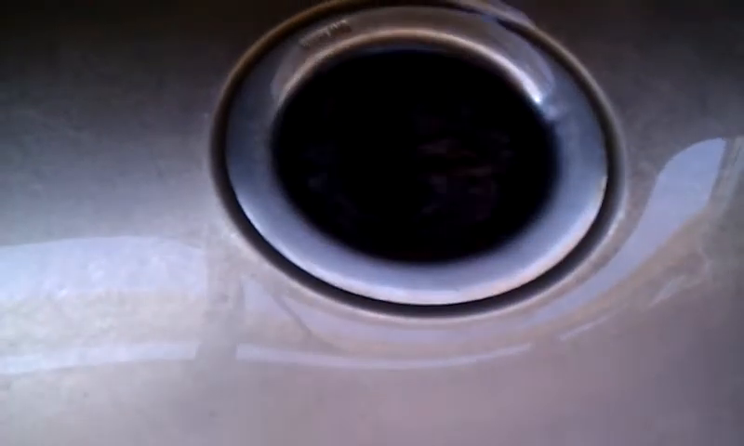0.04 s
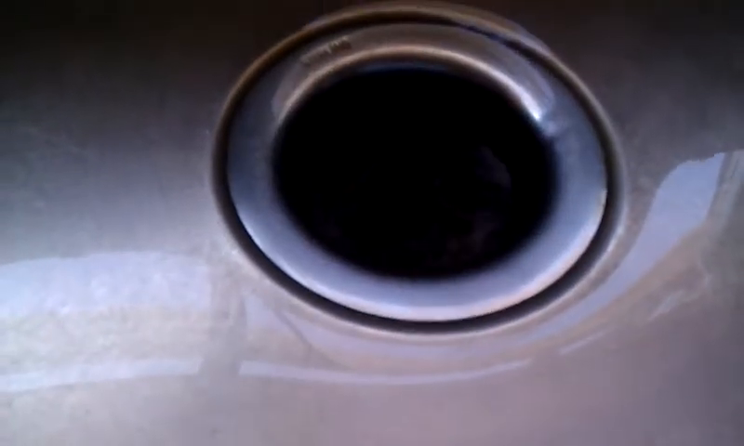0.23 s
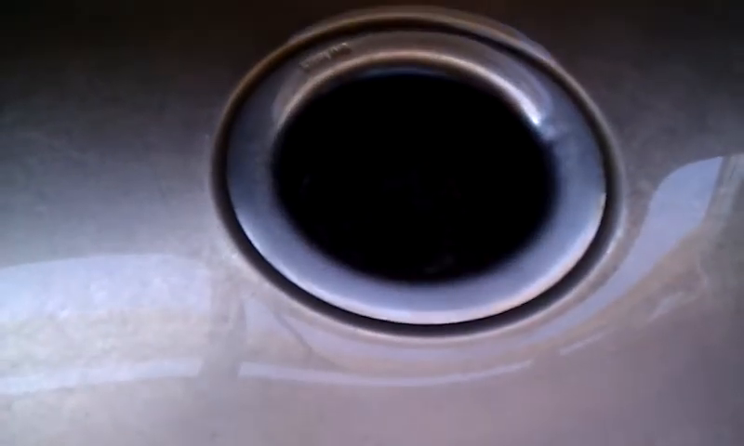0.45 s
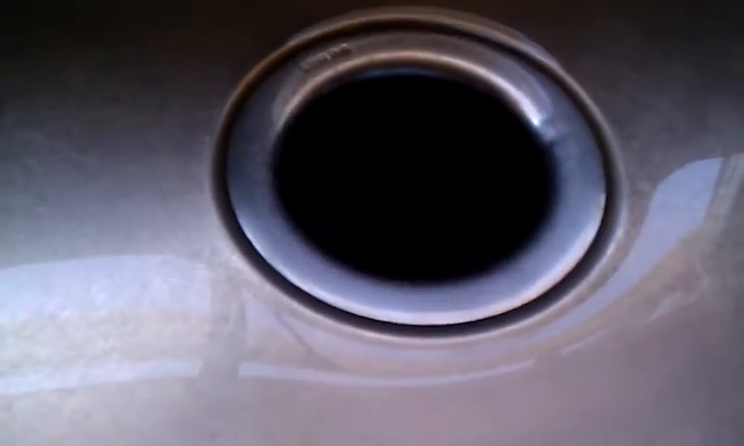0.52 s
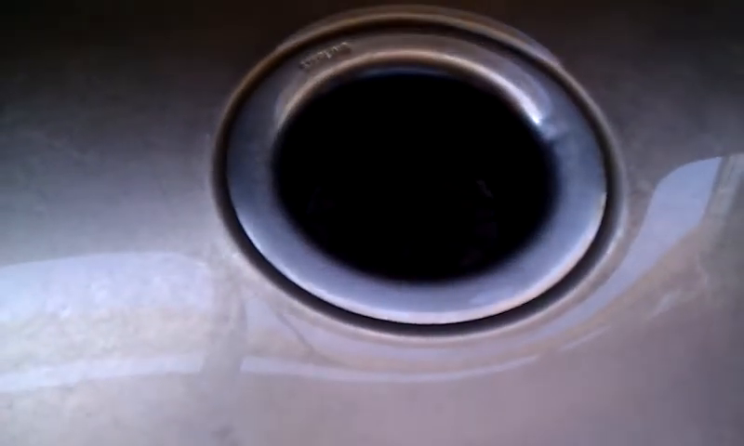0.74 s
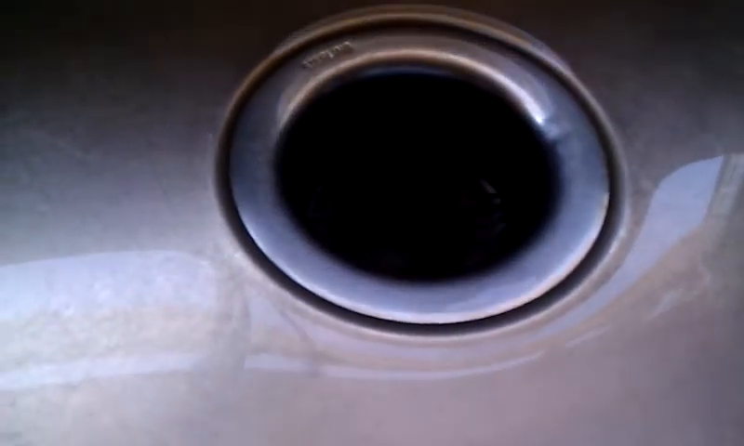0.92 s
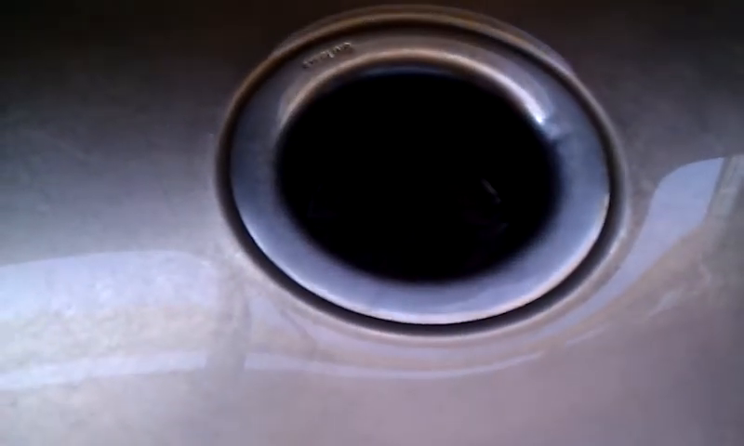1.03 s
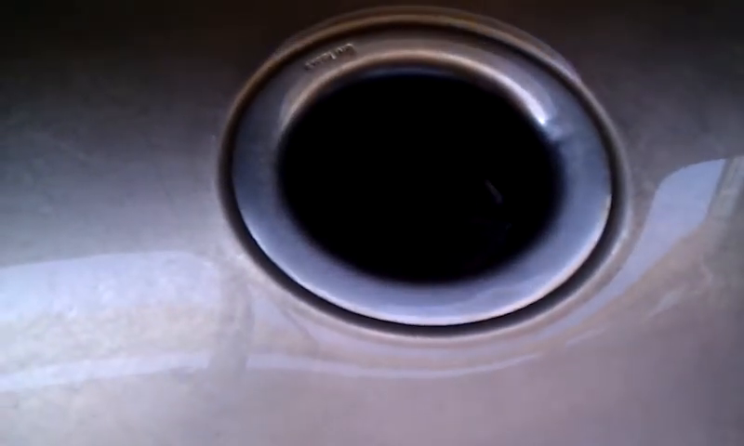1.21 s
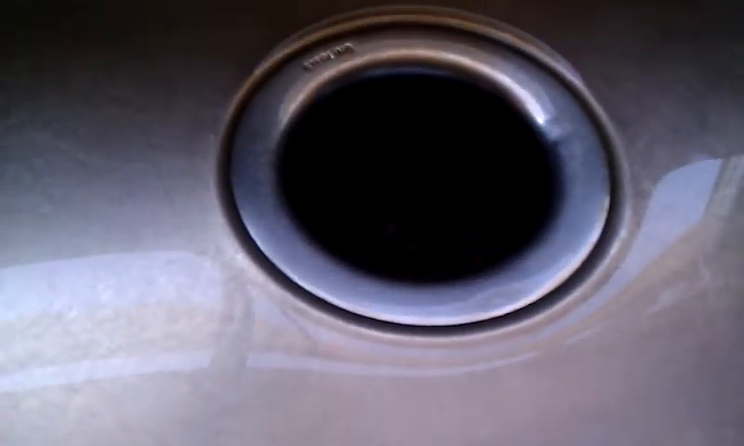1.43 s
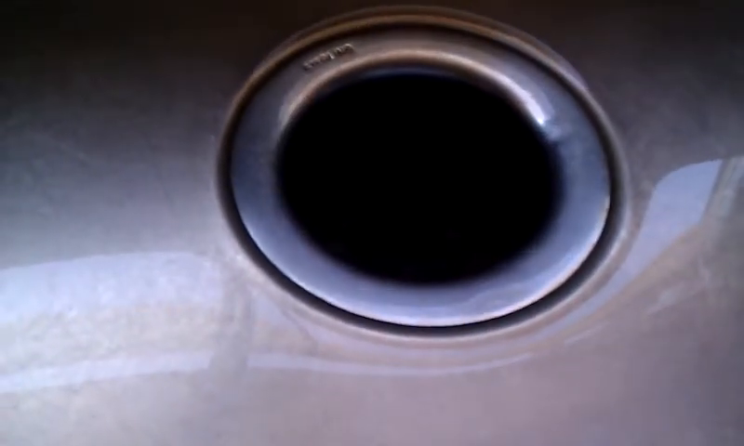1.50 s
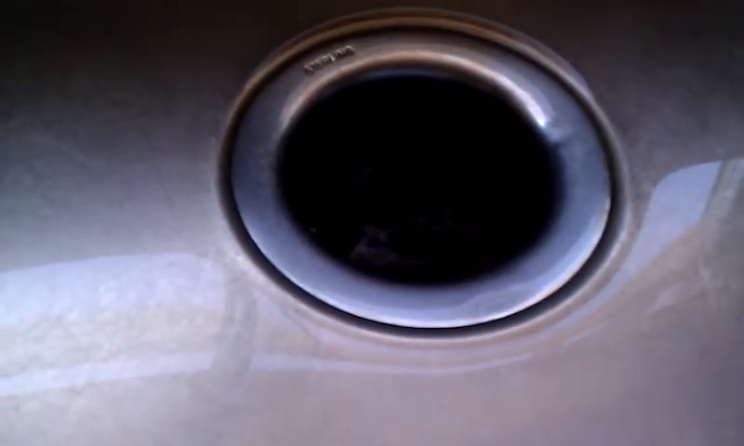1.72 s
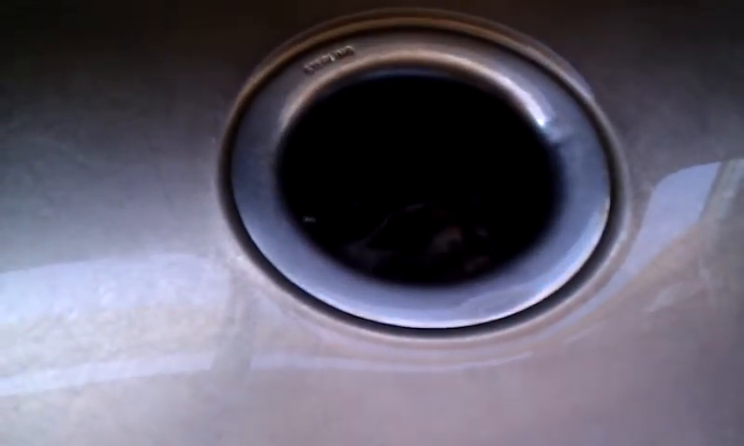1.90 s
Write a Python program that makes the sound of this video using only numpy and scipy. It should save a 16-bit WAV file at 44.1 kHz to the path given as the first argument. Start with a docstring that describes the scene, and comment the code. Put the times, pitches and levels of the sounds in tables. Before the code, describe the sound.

Close to a sink drain in a small quiet room, water splashes briefly, pauses, then gurgles down the ringing waste pipe. The bubbling gradually fades into separate plops and a few faint drips.

```python
"""A short splash, then a long gurgle thinning to single plops: a sink draining, close up.
The microphone is just above the plughole. Each trapped bubble rings briefly and rises in pitch.
The waste pipe hums along underneath, the basin throws the sound back,
and a small quiet room adds its tail."""
import sys
import numpy as np
from scipy import signal
from scipy.fft import rfft, irfft, next_fast_len
from scipy.io import wavfile
from scipy.ndimage import uniform_filter1d, minimum_filter1d

SR = 44100
rng = np.random.default_rng(int(sys.argv[2]) if len(sys.argv) > 2 else 0)


def store_wav(level_fs):
    """Save 16-bit WAV to argv[1]."""
    pcm = np.round(np.clip(np.atleast_2d(level_fs), -1, 1) * 32767)
    wavfile.write(sys.argv[1], SR, pcm.T.astype(np.int16))


N = 85995
TIME = np.arange(N) / SR
RISE_PER_S, ATTACK_CYCLES = 7.95, 0.46  # rise: share of a bubble's starting pitch

# loudest bubbles, right under the microphone (time [s], pitch [Hz], relative peak [dB], ring time [ms])
PLOPS = [(.2442,3640,-11,0.8),(.2444,6440,-11.5,0.41),(.2465,3430,-10.5,1.7),(0.2603,6960,-18,1.6),(.2602,3410,-16.5,3.3),(0.262,1070,-20.5,7.2),(.27,4780,-14,0.73),
         (0.2936,3920,-8.5,1.2),(.2989,3230,-15.5,5),(0.307,1700,-10.5,0.72),(0.3079,1127,-23.5,5.3),(0.314,3440,-9.5,0.76),(0.319,4160,-12,1.1),(0.32,7450,-16,1.05),(0.353,1825,-19.5,2.3),
         (0.5445,1250,-14.5,1.7),(0.5482,1380,-11.5,4.2),(.5825,1000,-26.5,0.79),(0.5823,7320,-18,1.04),(.5999,7520,-17,1.2),(0.5995,1150,-16,0.52),(.612,1290,-9.5,1),(.6168,1050,-11.5,1.5),(0.6205,1333,-16.5,10),(0.632,1510,-16.5,5.4),(0.6548,1156,-10,2.7),(0.6562,4540,-1.5,0.81),(0.6667,4500,-20.5,0.89),
         (.6922,895,-19.5,3),(.6998,866,-12,3.6),(0.7163,6500,-21.5,3.7),(0.7236,1120,-15.5,2.8),(0.7536,1040,-12.5,3.2),(0.753,6700,-18.5,1.3),(0.7684,1540,-16,7.5),(0.7751,1350,-12,0.69),(.8,3000,-9.5,0.84),(0.804,1325,-13.5,6.3),(0.8175,7100,-15,0.84),(.8197,4900,-17,2.3),(0.8648,4280,-16,1.2),
         (.941,6600,-20,1.1),(.9409,990,-13,2),(.9745,3400,-16.5,1.9),(.975,1330,-18,1.1),(1.0075,3590,-10.5,0.82),(1.015,1190,-15,3.1),(1.0288,1103,-19,19),(1.0619,1042,-15.5,5.4),(1.102,1080,-17,9),(1.1294,1050,-23.5,18),(1.143,4440,-20.5,1.9),(1.1713,3100,-21.5,3.9),(1.206,1318,-21.5,5),(1.245,1670,-24,3.1),
         (1.3087,3130,-14,0.62),(1.3153,1244,-19.5,14),(1.316,7400,-21,0.83),(1.3366,1778,-24.5,18),(1.3911,1165,-19.5,7.6),(1.4013,3185,-15.5,1.86),(1.4067,1206,-18.5,3.2),(1.448,1814,-25.5,2.8),(1.504,1503,-14.5,5.1),(1.5257,1092,-22,11),(1.7938,8050,-35,1.6)]
# the film bursts more gently as the flow slackens (time [s], relative level [dB])
SNAP_LEVEL = [(.3,-6.5),(1.5,-7)]
def plops():
    """Each bubble opens with a snap of its film and rings; the shorter the ring, the stronger the snap."""
    out, t = np.zeros(N), np.arange(SR // 100) / SR
    trim_db, snap_s = -0.5, 0.0021
    for start, hz, db, ring_ms in PLOPS:
        ring_s = ring_ms / 1000
        add(out, start, undb(db + trim_db) * bubble(hz, ring_s, RISE_PER_S, ATTACK_CYCLES))
        band = signal.butter(3, [.25 * hz, 1.3 * hz], "band", fs=SR)
        snap = unit(signal.lfilter(*band, rng.standard_normal(len(t)))) * np.exp(-t / snap_s)
        snap_gain = undb(db) * envelope(SNAP_LEVEL, start) * snap_s / (snap_s + ring_s)
        add(out, start, snap_gain * snap)
    return out


# crowds in the plughole: levels (time [s], relative level [dB]), colours (frequency [Hz], gain [dB])
GLUG_LEVEL = [(0,-84.5),(.24,-49.5),(.26,-39.5),(.32,-31.5),(.36,-42.5),(.54,-49.5),(.62,-31),(.7,-24),(.8,-32),(1,-33),(1.15,-49.5),(1.32,-36.5),(1.42,-52.5),(1.65,-42.5),(1.95,-57)]
GLUG_COLOUR = [(90,-20),(170,-14),(280,-4),(400,-6),(540,-2.5),(800,6),(1200,-12.5)]
GURGLE_LEVEL = [(0,-59.5),(.24,-56),(.265,-36),(.38,-40.5),(.45,-62),(.605,-33.5),(.635,-24),(.74,-28),(.81,-26.5),(.88,-26.5),(1.08,-27.5),(1.27,-37),(1.34,-31.5),(1.47,-42.5),(1.53,-39),(1.62,-45.5),(1.95,-52)]
GURGLE_COLOUR = [(500, -8.5), (850, -20), (1070, -4), (1250, -12.5), (1450, -1.5), (1750, -9.5),
                 (2400, -12), (3500, -15)]
SPRAY_LEVEL = [(0,-55.5),(.24,-53.5),(.25,-28),(.32,-44.5),(.35,-41),(.41,-40.5),(.46,-71),(.6,-45),(.67,-25),(.72,-40),(.83,-29.5),(.96,-39.5),(1.02,-30),(1.1,-40),(1.23,-41.5),(1.35,-35),(1.48,-43),(1.52,-38.5),(1.6,-55),(1.95,-82)]
SPRAY_COLOUR = [(1500,12),(2500,-13.5),(3200,0.5),(4000,-1.5),(5000,-4.5),(6000,-22.5)]
FIZZ_LEVEL = [(0,-79),(.24,-75),(.25,-46),(.32,-45.5),(.35,-82),(.57,-65.5),(.66,-39),(.83,-41),(1.1,-44.5),(1.26,-50.5),(1.32,-45.5),(1.48,-59.5),(1.52,-46),(1.57,-55.5),(1.95,-113)]
FIZZ_COLOUR = [(3000,-11.5),(4800,-2.5),(6700,-4),(8000,0.5)]
def gurgling():
    """Four crowds of lesser bubbles, from large glugs to fine fizz: the smaller, the higher they ring."""
    glugs = crowd(GLUG_LEVEL, GLUG_COLOUR, (185, 828), trim_db=-6.5, cycles=1.3, spread_db=1.5, count=900)
    gurgle = crowd(GURGLE_LEVEL, GURGLE_COLOUR, (736.6, 2440),
                   trim_db=-3, cycles=3.4, spread_db=3, count=1500)
    spray = crowd(SPRAY_LEVEL, SPRAY_COLOUR, (2185, 5180),
                  trim_db=-2.5, cycles=6.4, spread_db=3.5, count=4200)
    fizz = crowd(FIZZ_LEVEL, FIZZ_COLOUR, (4495, 8020), trim_db=5, cycles=12, spread_db=5, count=2200)
    return glugs + gurgle + spray + fizz


def crowd(levels, tint, band_hz, trim_db, cycles, spread_db, count):
    """Bubbles of random size and strength, evened out and then shaped by a level curve."""
    out = np.zeros(N)
    low_hz, high_hz = band_hz
    for when, size, strength, length, glide in rng.random((count, 5)):
        hz = low_hz * (high_hz / low_hz) ** size
        ring_s = cycles * 2 ** (2 * length - 1) / hz
        ring = bubble(hz, ring_s, 2 * glide * RISE_PER_S, ATTACK_CYCLES)
        add(out, when * N / SR, undb(-spread_db * np.log(1 - strength)) * ring)
    out = colour(out, tint)
    power = uniform_filter1d(uniform_filter1d(out ** 2, size=1800), size=900)
    return undb(trim_db) * envelope(levels) * out / np.sqrt(power + 1e-12)


def bubble(hz, ring_s, rise, swell_cycles):
    """Trapped air rings as a damped sine that swells over some cycles and glides in pitch."""
    t = np.arange(int(7 * ring_s * SR) + 8) / SR
    swell = (1 - np.exp(-t * hz / swell_cycles)) * np.exp(-t / ring_s)
    return swell / swell.max() * np.sin(2 * np.pi * hz * (t + rise * t * t / 2))


# waste pipe and trap, below the plughole (frequency [Hz], relative gain [dB], t60 [s])
PIPE_MODES = [(123.7,8,1),(179.3,6.5,0.47),(272.1,9.5,0.3),(368.3,3,0.24),(405.4,1,0.14),(458.2,2.5,0.35),(585,3,.3),(616.7,3,.4),(712,-7.5,0.89),(1530,-23.5,0.18)]
# water in the trap shifts the tuning (time [s], pitch [ratio])
PIPE_TUNING = [(.4,1.04),(0.799,1)]
def pipe(water):
    """The air column and trap ring on after each bubble, wavering as the water sloshes."""
    out = np.zeros(N)
    tuning = np.interp(TIME, *np.array(PIPE_TUNING).T)
    for hz, db, t60 in PIPE_MODES:
        slosh = 1 + .014 * waver(per_s=14)
        out += undb(db) * resonate(water, hz * tuning * slosh, t60)
    return undb(4) * out


# gulps farther down, deep in the trap (time [s], pitch [Hz], peak [dB], ring time [ms], rise [1/s])
GULPS = [(1.283,250,-30.5,4.5,20.5),(1.638,647,-35.5,20,-6),(1.678,671,-25.5,9.6,28.5),(1.808,712,-38,4.6,3)]
def gulps():
    """Large pockets of air swell softly and bend in pitch."""
    out = np.zeros(N)
    for start, hz, db, ring_ms, rise in GULPS:
        add(out, start, undb(db) * bubble(hz, ring_ms / 1000, rise, swell_cycles=2.7))
    return out


# last drops, close to the microphone (time [s], pitch [Hz], peak [dB], ring time [ms])
DRIPS = [(1.5435,3200,-25,2.8),(1.5495,3070,-24.5,3.5),(1.6846,2030,-32,5),(1.6845,4200,-30,2.2),(1.7935,3330,-30.5,1.8)]
# metal strainer in the plughole (frequency [Hz], gain [dB], t60 [s])
STRAINER_MODES = [(3068,11,.33),(3195,10,.3)]
def drips():
    """The last drops plink without a snap and leave the strainer ringing."""
    out = np.zeros(N)
    for start, hz, db, ring_ms in DRIPS:
        add(out, start, undb(db) * bubble(hz, ring_ms / 1000, RISE_PER_S / 2, swell_cycles=1.3))
    return out + sum(undb(db) * resonate(out, hz, t60) for hz, db, t60 in STRAINER_MODES)


# hiss off the pipe wall (frequency [Hz], gain [dB])
WASH_COLOUR = [(900,-23),(1900,6.5),(4200,7),(6000,-16.5)]
def wash():
    """Water sheeting down the pipe wall fills the gaps between the bubbles of the spray."""
    return undb(-8) * envelope(SPRAY_LEVEL) * noise(WASH_COLOUR)


def high_hiss():
    """A brief, faint, very high hiss at the gurgle's loudest moment."""
    centre_s, width_s = 0.6585, 0.0093
    hiss = unit(butter(rng.standard_normal(N), 8, (12500, 15500), "band"))
    return undb(-39) * hiss * np.exp(-.5 * ((TIME - centre_s) / width_s) ** 2)


# rumble from down the pipe (time [s], level [dB])
FLOW_LEVEL = [(0,-78),(.55,-66),(0.662,-50),(1.101,-51.5),(1.451,-54),(1.95,-65)]
# its colour (frequency [Hz], gain [dB])
FLOW_COLOUR = [(60,-3.5),(120,7),(190,8),(300,-29.5)]
def flow():
    """Water running away down the pipe rumbles softly."""
    return envelope(FLOW_LEVEL) * noise(FLOW_COLOUR)


# draught behind the last plops (time [s], level [dB])
DRAUGHT_LEVEL = [(.9,-79),(1.25,-46.5),(1.4,-55.5),(1.55,-43.5),(1.75,-55),(1.95,-52.5)]
def draught():
    """Air drawn through the emptying pipe sounds a soft, breathy note."""
    hz, t60 = 737, 0.056
    breath = resonate(rng.standard_normal(N), hz, t60)
    note = resonate(breath, hz, t60 / 10)
    power = uniform_filter1d(note ** 2, size=SR // 10)
    return envelope(DRAUGHT_LEVEL) * note / np.sqrt(power)


def echoes(x, delay_s, t60, treble_t60, split_hz):
    """Dense reflections off nearby surfaces; the treble has its own decay."""
    t = np.arange(SR // 2) / SR
    low = butter(rng.standard_normal(len(t)), 2, split_hz, "low")
    high = butter(rng.standard_normal(len(t)), 2, split_hz, "high")
    arrived = t > delay_s
    tail = (low * fade(t, t60) + high * fade(t, treble_t60)) * arrived
    return signal.fftconvolve(x, tail / np.linalg.norm(fade(t, t60) * arrived))[:N]


# the quiet room around the sink (frequency [Hz], gain [dB])
ROOM_COLOUR = [(30, -18.5), (100, -2), (290, 2), (560, 7), (1300, -7.5), (2400, -0.5), (3600, -5),
               (5200, -11), (8000, -19.5)]
def room_tone():
    """Faint, steady noise far behind the water."""
    return undb(-54.5) * noise(ROOM_COLOUR)


def undb(db):
    """Decibels to gain."""
    return 10 ** (np.asarray(db) / 20)


def unit(x):
    """Scale to rms 1."""
    return x / np.sqrt(np.mean(x ** 2))


def envelope(levels, t=TIME):
    """Gain along (time [s], level [dB]) points."""
    return undb(np.interp(t, *np.array(levels).T))


def fade(t, t60):
    """Decay of 60 dB in t60 seconds."""
    return np.exp(-np.log(1000) * t / t60)


def add(out, start_s, sound):
    """Mix a short sound in at a time."""
    i = int(np.clip(start_s * SR, 0, N - 1))
    out[i:i + len(sound)] += sound[:N - i]


def colour(x, points):
    """Causal filter through (frequency [Hz], gain [dB]) points."""
    hz, db = np.array(points, float).T
    size = 2 * next_fast_len(N)
    log_hz = np.log(np.arange(size // 2 + 1) * SR / size + 1)
    gain = undb(np.interp(log_hz, np.log(hz), db))
    cepstrum = irfft(np.log(gain))
    cepstrum[1:size // 2] *= 2  # minimum phase
    return irfft(rfft(x, size) * np.exp(rfft(cepstrum[:size // 2], size)))[:N]


def noise(tint):
    """Coloured noise of rms 1."""
    return unit(colour(rng.standard_normal(N), tint))


def butter(x, order, hz, kind):
    """Low-, high- or band-pass without ripple."""
    return signal.sosfilt(signal.butter(order, hz, kind, fs=SR, output="sos"), x)


def low_pass(x, hz):
    """Steep low-pass."""
    return signal.sosfilt(signal.ellip(8, .3, 60, hz, fs=SR, output="sos"), x)


def resonate(x, hz, t60):
    """A resonance of gain 1 whose pitch may move from sample to sample."""
    turn = np.exp(2j * np.pi * np.cumsum(hz * np.ones(N)) / SR)
    decay = fade(1 / SR, t60)
    return (turn * signal.lfilter([2 * (1 - decay)], [1, -decay], x / turn)).real


def waver(per_s):
    """Smooth random motion with a spread near 1."""
    size = int(SR / per_s)
    steps = np.repeat(rng.standard_normal(N // size + 1), size)
    return uniform_filter1d(steps, size=size)[:N]


def scene():
    """Just above the plughole: the drain below, the basin close around, the room beyond."""
    water = plops() + gurgling() + gulps() + drips() + wash() + flow()
    drain = water + pipe(water) + draught() + draught()
    basin = undb(-6) * echoes(drain, delay_s=.002, t60=.12, treble_t60=.06, split_hz=5200)
    room = undb(-12) * echoes(drain, delay_s=.013, t60=.54, treble_t60=.29, split_hz=4100)
    return (low_pass(drain + basin + room + room_tone(), hz=8500) + high_hiss())[None]


# response of the small microphone over the sink (frequency [Hz], gain [dB])
MICROPHONE = [(120, -1.5), (5000, 2.5), (5400, -2), (5850, -7), (6300, 5.5), (7600, 2.5), (8300, 0)]
def record(dry):
    """One microphone with thin bass and a treble notch, then a fast limiter and a steep top cut."""
    low_cut_hz, ceiling = 98, .5
    heard = butter(colour(dry[0], MICROPHONE), 2, low_cut_hz, "high")
    peak = -minimum_filter1d(-np.abs(heard), size=90)
    gain = uniform_filter1d(np.minimum(1, ceiling / (peak + 1e-9)), size=90)
    return low_pass(heard * gain, hz=16000)[None]


dry = scene()
out = record(dry)
store_wav(out)
```